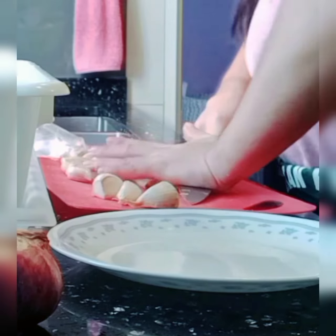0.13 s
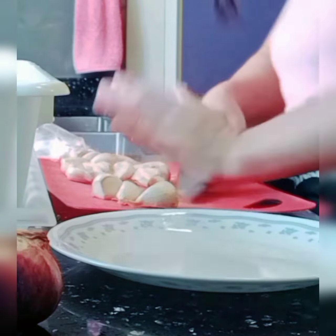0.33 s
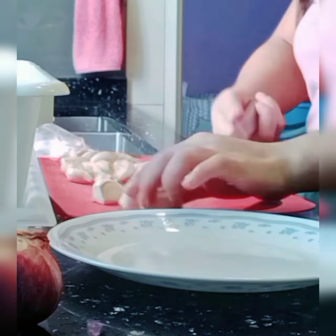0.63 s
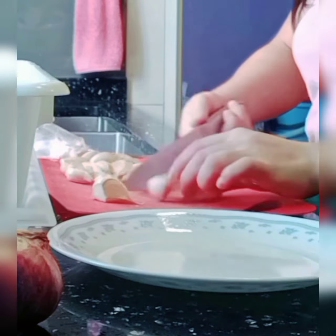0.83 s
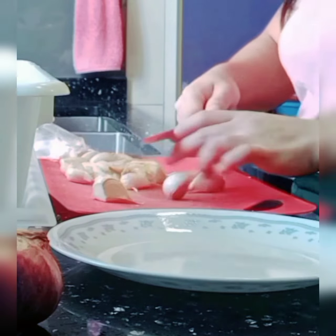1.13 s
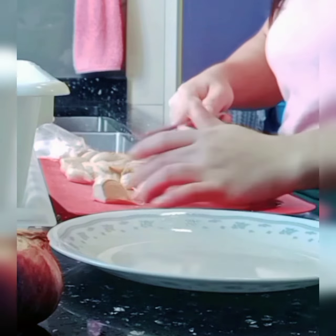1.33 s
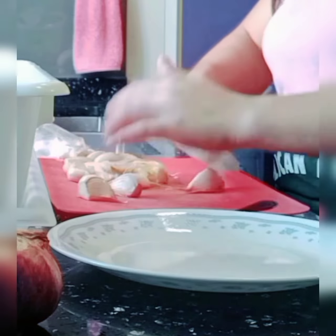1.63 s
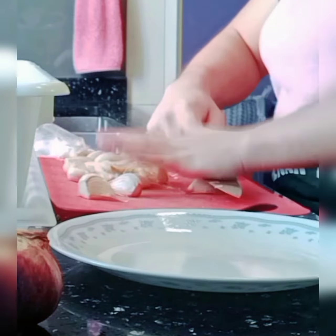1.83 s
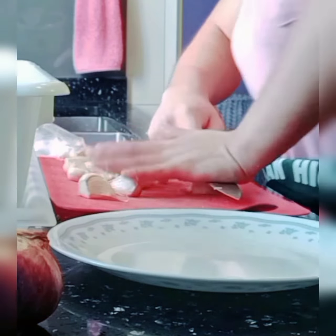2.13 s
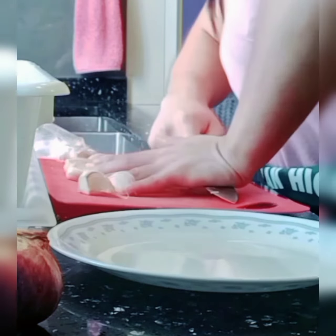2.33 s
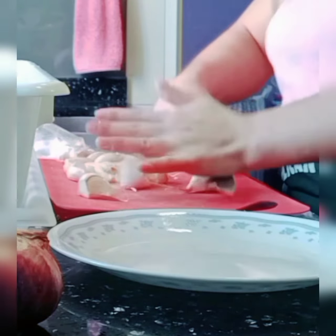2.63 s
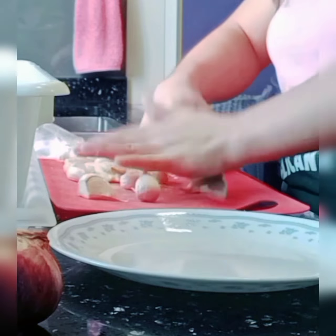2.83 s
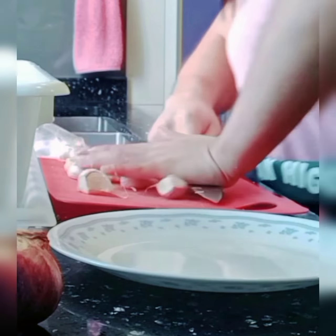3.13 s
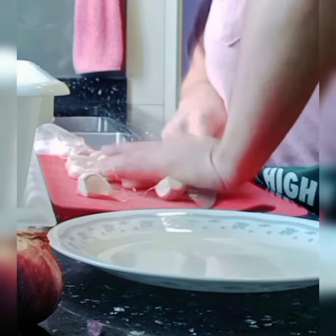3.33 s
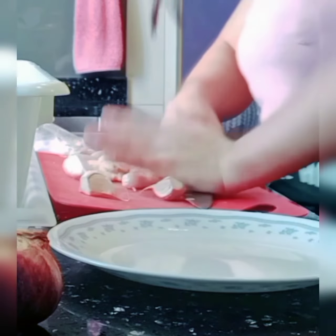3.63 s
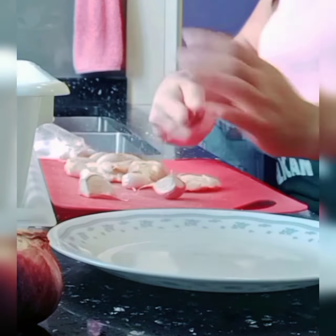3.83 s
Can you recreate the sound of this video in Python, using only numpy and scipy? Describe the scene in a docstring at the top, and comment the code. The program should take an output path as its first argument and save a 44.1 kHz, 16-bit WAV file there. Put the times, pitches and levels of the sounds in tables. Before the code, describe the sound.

Garlic cloves are crushed under a flat knife: a faint crunch, a gritty blade scrape, then a sharp crackling crush and a final loud snap with a deep thump, close in a small reflective kitchen.

```python
"""Garlic cloves are crushed three times under the flat of a knife on a plastic board, in a small kitchen.
Each clove bursts in swarms of tiny clicks, coloured as snapping skin, crunch and squashed flesh; the
pressed blade rings briefly, and jolts and low decaying tones make the board knock and thump.
Papery skin crackles, light taps are coloured noise, and the scraping blade is grit with a steel ring.
A low hum of coloured noise fills the room; the work sits in the centre, with the walls' reflections."""
import sys
import numpy as np
from scipy import signal
from scipy.fft import rfft, irfft
from scipy.io import wavfile
from scipy.ndimage import uniform_filter1d

SR = 44100
rng = np.random.default_rng(int(sys.argv[2]) if len(sys.argv) > 2 else 0)


def put_to_file(sound):
    """Save the sound as 16-bit audio at rate SR, in the file named by the first command-line argument."""
    columns = np.atleast_2d(sound).T  # one column per channel
    safe = np.clip(columns, -1, 1)
    whole_steps = np.round(safe * 32767)
    wavfile.write(sys.argv[1], SR, whole_steps.astype(np.int16))


N = 176400
KNOCK_S = 0.0046  # length of a light touch or tap


def undb(db):
    """Decibels to amplitude gain."""
    return 10 ** (np.asarray(db) / 20)


def unit(x):
    """Scale to rms 1."""
    return x / np.sqrt(np.mean(x ** 2))


def clock():
    """The time of every sample, in seconds."""
    return np.arange(N) / SR


def through(x, response):
    """Pass a sound through an impulse response scaled to unit energy."""
    return signal.fftconvolve(x, response / np.linalg.norm(response))[:N]


def colour(x, points, shift=1, size=8192):
    """Minimum-phase filter through (frequency [Hz], relative level [dB]) points, moved in pitch by shift."""
    hz, db = np.array(points, float).T
    f = np.maximum(np.fft.rfftfreq(size, 1 / SR), 1)
    level_db = np.interp(np.log(f), np.log(hz * shift), db)
    # folding the cepstrum onto positive time makes the filter causal
    cepstrum = irfft(np.log(undb(level_db)))
    cepstrum[1:size // 2] *= 2
    cepstrum[size // 2 + 1:] = 0
    return through(x, irfft(np.exp(rfft(cepstrum))))


def fade(t, t60):
    """Exponential decay, 60 dB down after t60 seconds."""
    return np.exp(-np.log(1000) * t / t60)


def ring(x, modes):
    """Drive damped modes (Hz, dB, t60 in s); dB sets each mode's share of the energy."""
    t = clock()[:SR // 2]
    response = 0
    for hz, db, t60 in modes:
        gain = undb(db) / np.sqrt(t60)  # a longer ring starts weaker for the same energy
        response = response + gain * fade(t, t60) * np.sin(2 * np.pi * hz * t)
    return through(x, response)


def walk(rate):
    """Smoothed random steps, rate per second, with a spread of 1."""
    k = int(SR / rate)
    steps = np.repeat(rng.standard_normal(N // k + 1), k)
    return unit(uniform_filter1d(steps, k)[:N])


def clicks(per_s, spread_db, size=441):
    """A dense swarm of uneven clicks, levelled to steady power over size samples."""
    hits = rng.random(N) < per_s / SR
    x = hits * rng.choice([-1, 1], N) * undb(spread_db * rng.exponential(size=N))
    power = uniform_filter1d(x ** 2, size)
    return x / np.sqrt(np.maximum(power, 1e-6))


def burst(start, length):
    """Envelope of one break: quick rise, hold to half its length, then exponential release."""
    t = clock() - start
    rise = np.clip(t / (0.35 * length), 0, 1)
    release_s = 0.0023 + length / 10
    return rise * np.exp(-np.maximum(t - length / 2, 0) / release_s)


def fractures():
    """Tiny breaks in skin and flesh, as a swarm of clicks."""
    return clicks(per_s=7000, spread_db=3.5)


def hum():
    """A fan-like hum: noise through broad resonances, its level wavering a little."""
    level_db, waver_db, waver_per_s = -49, 1.22, 36
    # broad resonances of the hum: (frequency [Hz], relative level [dB])
    hum_colour = [(25, 0), (50, -13.5), (80, 11), (105, 5), (145, -5.5), (215, -5), (340, -22), (430, -8.5),
                  (550, -16), (680, -13.5), (800, -3.5), (1000, -22), (1250, -2.5), (1480, -22),
                  (1680, -19), (1900, -26), (4000, -29.5), (7500, -35), (10000, -44), (16000, -48)]
    level = undb(level_db + waver_db * walk(waver_per_s))
    return level * colour(rng.standard_normal(N), hum_colour)


def cloves():
    """Skin snaps, the clove crunches and squashes, and the pressed blade rings briefly."""
    # cloves giving way: (time [s], length [s], skin snap level [dB], crunch level [dB],
    # flesh squash level [dB], blade ring level [dB])
    cracks = [(0.181, 0.023, -52, -38.5, -37, -53), (0.193, 0.0059, -49, -30, -39.5, -50),
              (0.227, 0.0085, -43, -41, -61, -68), (2.313, 0.018, -44, -50, -39.5, -68),
              (2.363, 0.024, -44.5, -34, -45.5, -62), (2.375, 0.012, -35, -30.5, -34.5, -45),
              (2.397, 0.017, -43, -36, -44, -40), (2.419, 0.024, -27.5, -28.5, -42, -54),
              (2.43, 0.0059, -25.5, -24.5, -33.5, -30), (3.424, 0.077, -43.5, -41.5, -40.5, -39.5),
              (3.478, 0.019, -27, -27.5, -33.5, -63), (3.484, 0.012, -22.5, -37, -34, -20)]
    # colours of snapping skin, crunch and squashed flesh: (frequency [Hz], relative level [dB])
    skin_colour = [(800, -43), (2000, -13), (3200, -5.5), (4800, -10), (6400, -6.5), (8500, -3),
                   (11000, -5.5), (13500, -15.5), (16000, -7.5)]
    crunch_colour = [(700, -24.5), (1900, -6.5), (2500, -6), (3400, 1), (4700, -9), (6400, -2),
                     (7800, -5.5), (9500, -24), (16000, -12.5)]
    flesh_colour = [(200, -17.5), (430, 13.5), (600, -0.5), (780, 16.5), (980, -2), (1250, 14),
                    (1700, -5.5), (2200, -7), (3000, -14.5), (9000, -42)]
    # modes of the blade damped by the palm: (frequency [Hz], relative level [dB])
    pressed_modes = [(1260, -6), (6100, -16), (7200, -13), (7420, 6), (8440, -1.5), (10600, -8),
                     (11720, -12)]
    pressed_t60_s = 0.02
    shapes = np.array([burst(row[0], row[1]) for row in cracks])
    gains = undb(np.array(cracks)[:, 2:])
    envelopes = gains.T @ shapes  # one envelope per layer, all cracks summed
    skin, crunch, flesh, push = (envelope * fractures() for envelope in envelopes)
    steel = ring(push, [(hz, db, pressed_t60_s) for hz, db in pressed_modes])
    return colour(skin, skin_colour) + colour(crunch, crunch_colour) + colour(flesh, flesh_colour) + steel


def board():
    """Each jolt is a short push into the board's modes; a longer contact sounds duller."""
    # jolts of clove and blade against the board: (time [s], level [dB], contact time [s])
    jolts = [(0.195, -26, 0.0026), (0.226, -31, 0.0045), (1.695, -41.5, 0.0027), (1.835, -40, .004),
             (2.3179, -27.5, 0.0024), (2.3738, -25, 0.0017), (2.4241, -20.5, 0.0032), (3.4783, -29, 0.0012),
             (3.4843, -15, 0.0015), (3.565, -29.5, 0.0015)]
    # modes of the board: (frequency [Hz], relative level [dB], t60 [s])
    board_modes = [(192, -12, .08), (226.8, -1, 0.097), (281.5, -6.5, .06), (425, -4, 0.089),
                   (514, -17.5, 0.048)]
    t = clock()
    push = 0
    for start, db, contact in jolts:
        half_sine = np.sin(np.pi * np.clip((t - start) / contact, 0, 1))
        push = push + undb(db) * half_sine * np.pi / (2 * contact * SR)  # equal area for any contact
    modes = sum(undb(db) * fade(t, t60) * np.sin(2 * np.pi * hz * t) for hz, db, t60 in board_modes)
    return signal.fftconvolve(push, modes)[:N]


def thumps():
    """Board and counter boom on one low decaying tone as the hand drops onto them."""
    # the board pressed against the counter: (time [s], level [dB],
    # onset [s]: full at half of it, fading after it)
    presses = [(0.196, -40, 0.014), (2.379, -29, 0.014), (2.435, -25, 0.0065), (2.718, -41.5, 0.0068),
               (3.020, -38.5, 0.027), (3.498, -16, .034)]
    boom_hz, boom_t60_s = 87.3, 0.24
    out = 0
    for start, db, onset in presses:
        t = np.maximum(clock() - start, 0)
        swell = np.minimum(t / (onset / 2), 1) * fade(np.maximum(t - onset, 0), boom_t60_s)
        out = out + undb(db) * swell * np.sin(2 * np.pi * boom_hz * t)
    return out


def crackles():
    """Papery skin breaks in small bursts of fractures, each with its own pitch of colour."""
    # dry skin under blade and fingers: (time [s], length [s], level [dB], pitch of the colour [ratio])
    skin_breaks = [(0.249, 0.016, -47, 1.05), (0.288, 0.014, -64, 1.7), (0.305, .014, -41.5, 0.94),
                   (0.417, .010, -41.5, 1.03), (0.449, 0.013, -43.5, 0.96), (0.484, .012, -53, 1),
                   (0.75, 0.02, -54.5, 1.37), (0.768, 0.023, -49, 1.3), (0.813, 0.014, -42.5, 1.34),
                   (1.575, 0.028, -64, 1.1), (2.065, 0.022, -62, 1.63), (2.142, 0.0076, -46, 1.32),
                   (2.151, 0.011, -49, 1.1), (2.205, 0.0094, -43, 1.1), (2.281, 0.041, -64, 1.4),
                   (2.305, 0.012, -49, 2), (2.718, 0.029, -59, 1.1), (2.742, .012, -44, 0.99),
                   (2.974, 0.024, -53.5, 1.07), (3.333, 0.027, -50, 1.07), (3.368, 0.041, -45.5, 1.12),
                   (3.395, 0.026, -47, 0.95), (3.423, 0.0058, -31.5, 1.12), (3.703, 0.1, -52, 1.05),
                   (3.822, 0.0058, -60.5, 1.5)]
    # colour of dry skin: (frequency [Hz], relative level [dB])
    dry_colour = [(800, -13), (2000, -18), (3100, -5), (4600, -9.5), (6500, 0), (8500, -3.5), (12000, -17),
                  (16000, -11)]
    swarm = fractures()
    out = 0
    for start, length, db, shift in skin_breaks:
        out = out + colour(undb(db) * burst(start, length) * swarm, dry_colour, shift)
    return out


def knocks():
    """Short dull taps: bursts of noise through the colour of a light knock."""
    # light knocks: (time [s], level [dB])
    taps = [(0.545, -47.5), (1.668, -51.5), (2.797, -32.5), (2.804, -35.5), (2.811, -35.5), (3.800, -50.5),
            (3.832, -48.5)]
    # colour of a knock: (frequency [Hz], relative level [dB])
    knock_colour = [(150, -34.5), (380, -17.5), (480, 1), (850, -6), (1300, 8.5), (1950, -10.5),
                    (2350, -17.5), (4000, -50.5)]
    envelope = sum(undb(db) * burst(start, KNOCK_S) for start, db in taps)
    return colour(envelope * rng.standard_normal(N), knock_colour)


def free_blade(x):
    """The freely held steel takes the same number of cycles to die away in every mode."""
    # modes of the blade ringing freely: (frequency [Hz], relative level [dB])
    free_modes = [(2713, 3), (2972, 5), (4048, -2.5), (5012, 2), (6266, -22), (6616, -17), (7500, 4),
                  (9819, 0.5), (11710, -4)]
    cycles = 790  # until 60 dB down
    return ring(x, [(hz, db, cycles / hz) for hz, db in free_modes])


def scrape():
    """The edge rasps over the board and sets the blade ringing, then lightens to a hiss."""
    # the blade drawn over the board: (time [s], low rasp level [dB], hiss level [dB], blade ring level [dB])
    strokes = [(0.76, -61, -75, -78), (0.811, -48.5, -65, -57), (0.85, -39, -39.5, -49),
               (0.895, -35.5, -50, -37.5), (0.935, -39, -48, -36), (0.955, -44.5, -34.5, -45),
               (0.989, -44.5, -31.5, -47.5), (1.04, -68, -37.5, -51), (1.105, -65, -41, -87),
               (1.13, -80, -70, -71)]
    # the blade touched lightly while held free: (time [s], level [dB])
    tings = [(0.755, -64), (0.813, -61), (1.249, -56.5)]
    # colours of the rasp and the hiss: (frequency [Hz], relative level [dB])
    rasp_colour = [(70, -26), (200, 1), (420, -2.5), (600, -3.5), (820, 6), (1050, -7.5), (1300, -1.5),
                   (1800, 2), (2300, -8.5), (3000, -3), (4500, -13.5), (9000, -14.5)]
    hiss_colour = [(1000, -27.5), (2500, -6.5), (4000, 0), (5300, -1), (6700, 6), (8500, -1.5),
                   (11000, -8.5), (13500, -25), (16000, 3.5)]
    judder_db, judder_per_s = 1.36, 91.65
    times, *levels = np.array(strokes).T
    judder = judder_db * walk(judder_per_s)  # shared by all three layers
    layers = []
    for db in levels:
        level_db = np.interp(clock(), times, db, left=-120, right=-120)
        layers.append(undb(level_db + judder) * clicks(per_s=7000, spread_db=2.5))
    rasp, hiss, steel = layers
    touches = sum(undb(db) * burst(start, KNOCK_S) for start, db in tings) * fractures()
    return colour(rasp, rasp_colour) + colour(hiss, hiss_colour) + free_blade(steel + touches)


def kitchen(x, wet_db):
    """Quick reflections from the counter, then the tail of the hard walls, shorter in the treble."""
    early_db, early_s = -4, 0.022  # early_s is a time constant
    split_hz, low_t60_s, treble_t60_s, onset_s = 6800, 0.46, 0.34, 0.0054
    t = clock()[:SR]
    early, low_noise, high_noise = rng.standard_normal((3, SR))
    low = signal.sosfilt(signal.butter(4, split_hz, fs=SR, output="sos"), low_noise)
    high = signal.sosfilt(signal.butter(4, split_hz, "high", fs=SR, output="sos"), high_noise)
    tail = low * fade(t, low_t60_s) + high * fade(t, treble_t60_s)
    walls = tail * np.minimum(t / onset_s, 1)
    reflections = undb(early_db) * through(x, early * np.exp(-t / early_s))
    return x + reflections + undb(wet_db) * through(x, walls)


def scene():
    """The work on the board sits in the centre; only the room's hum has a trace of width."""
    garlic = kitchen(cloves() + crackles() + knocks(), wet_db=-3.5)
    blade = kitchen(scrape(), wet_db=-12.5)
    jolted_board = kitchen(board(), wet_db=-8)
    mono = garlic + blade + jolted_board + thumps() + hum()
    side = undb(-27) * hum()
    return np.array([mono + side, mono - side])


def record(dry):
    """The microphone lifts a narrow top-treble band, rounds loud peaks, and cuts deep bass and the very top."""
    peak_hz, peak_width_hz, peak_db = 14940, 165, 14
    peak_limit, low_hz, top_hz = 0.21, 45.4, 15500  # limit in full-scale units
    f = np.fft.rfftfreq(2 * N, 1 / SR)
    lift = undb(peak_db * np.exp(-0.5 * ((f - peak_hz) / peak_width_hz) ** 2))
    bright = irfft(rfft(dry, 2 * N) * lift)[:, :N]
    rounded = peak_limit * np.tanh(bright / peak_limit)
    lean = signal.sosfilt(signal.butter(2, low_hz, "high", fs=SR, output="sos"), rounded)
    return signal.sosfilt(signal.ellip(10, 0.2, 80, top_hz, fs=SR, output="sos"), lean)


dry = scene()
out = record(dry)
put_to_file(out)
```